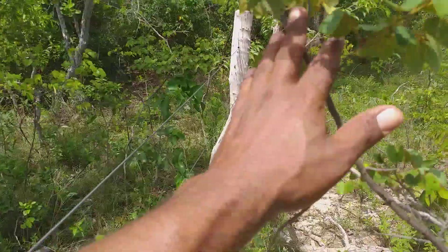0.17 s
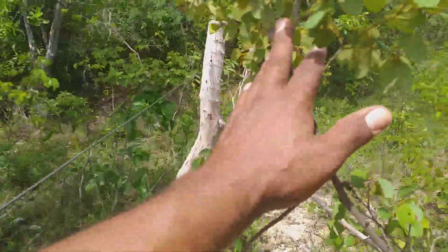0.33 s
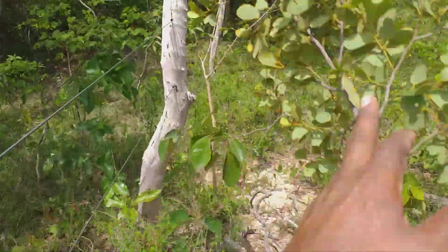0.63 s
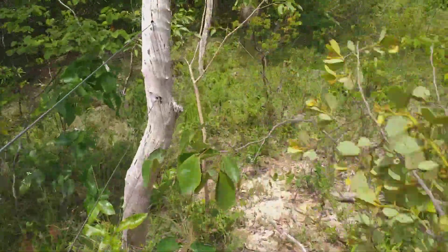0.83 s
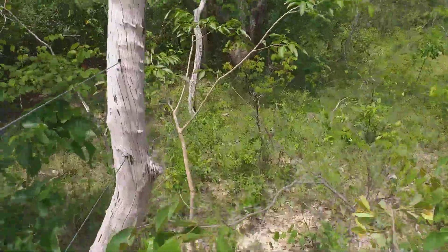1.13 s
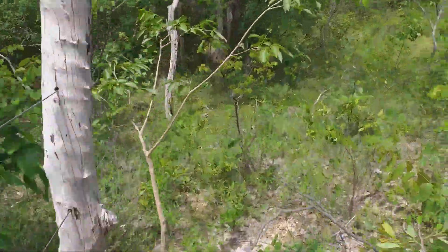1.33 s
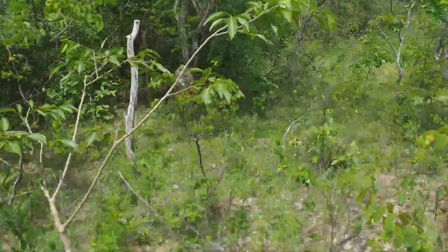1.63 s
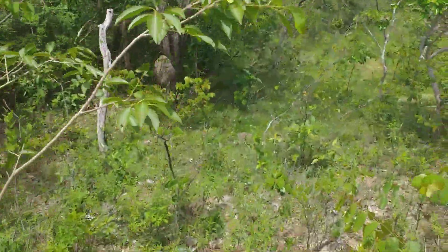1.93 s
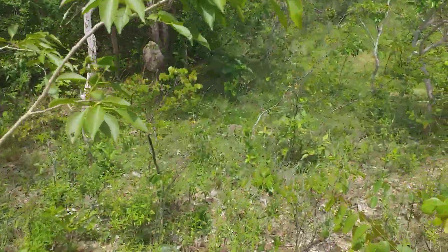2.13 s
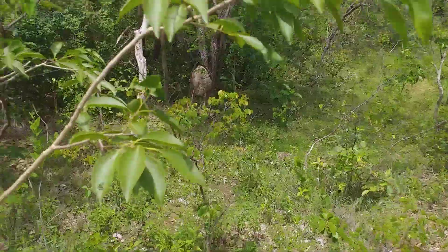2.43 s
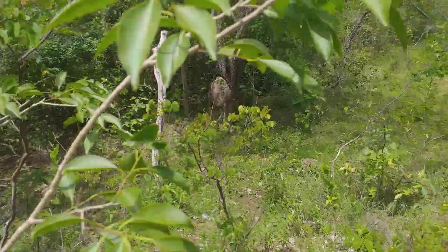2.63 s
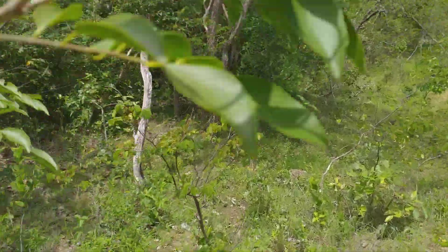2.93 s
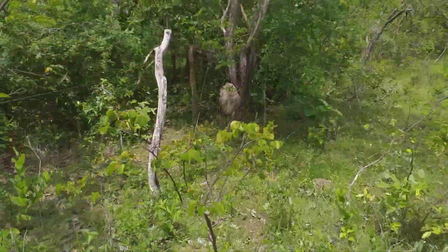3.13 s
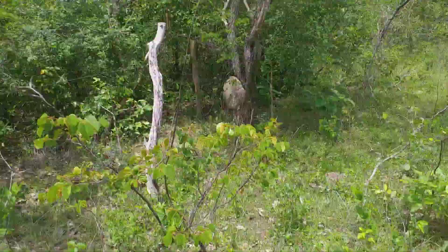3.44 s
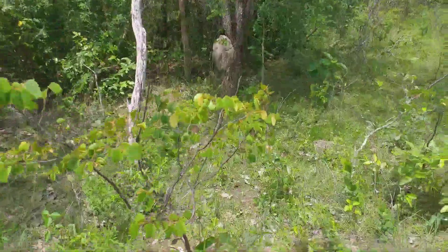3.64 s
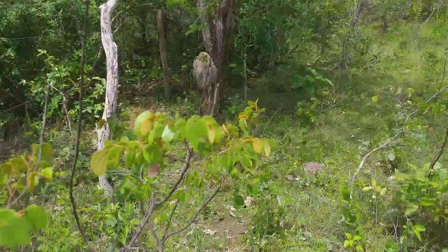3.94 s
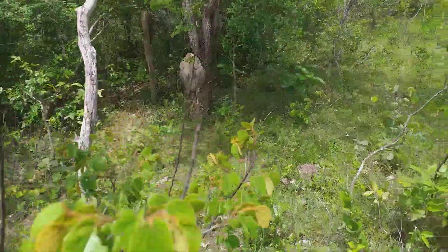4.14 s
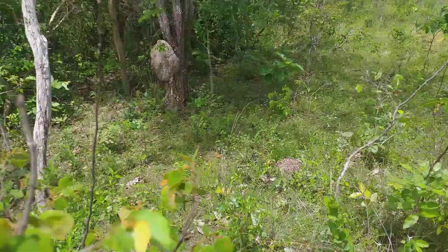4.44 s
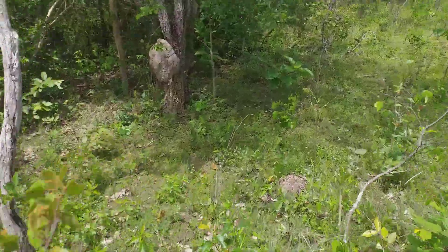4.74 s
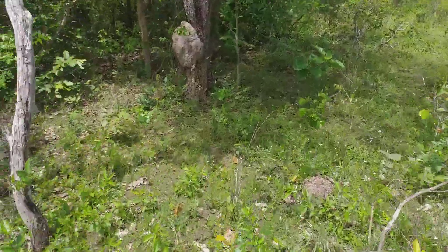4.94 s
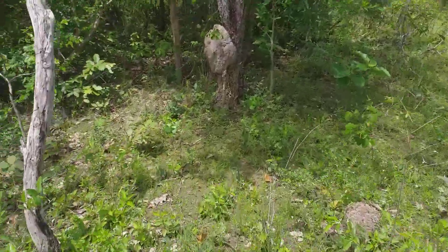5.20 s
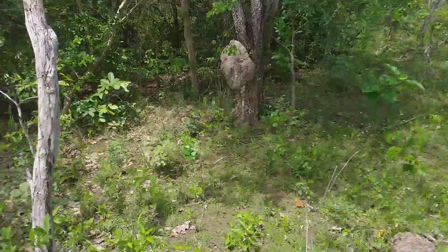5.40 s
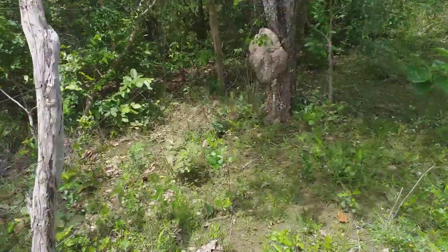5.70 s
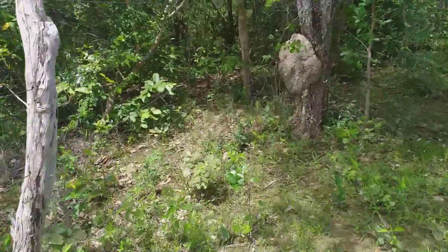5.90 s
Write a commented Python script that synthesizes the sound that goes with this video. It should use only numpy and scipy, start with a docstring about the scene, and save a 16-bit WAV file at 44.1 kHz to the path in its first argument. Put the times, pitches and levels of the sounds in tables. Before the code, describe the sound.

Close to one microphone in open dry woodland, someone moves through brush. Light leaf crunches and a soft thud come first, then a firm push with a cluster of twig snaps. It quiets to faint rustles and low knocks, a few sharp snaps follow, and dense, louder crunching fills the second half before thinning to two firm last pushes.

```python
"""Someone pushes through dry scrub woodland for six seconds, close to one microphone.
It opens with light crunching and a soft thud; a firmer push near 0.8 s brings a cluster of snaps and another thud.
Quieter leaves and low knocks follow; twigs snap at 2.2-2.4 s, then denser, louder crunching starts near 2.7 s.
The strongest snap comes near 3.2 s; past 4.9 s the snaps thin out, and two firm pushes close the scene.
Leaves are clumped ringing cracks, twigs torn resonant bursts, rubbing muffled slips, thuds damped swings."""
import sys
import numpy as np
from scipy import signal
from scipy.fft import rfft, irfft
from scipy.io import wavfile
from scipy.ndimage import uniform_filter1d

SR = 44100
rng = np.random.default_rng(int(sys.argv[2]) if len(sys.argv) > 2 else 0)


def store_pcm(level_fs):
    """Save levels as 16-bit WAV."""
    pcm = np.round(np.clip(level_fs, -1, 1) * 32767).astype(np.int16)
    wavfile.write(sys.argv[1], SR, np.atleast_2d(pcm).T)


N = 267466
TIME = np.arange(N) / SR   # seconds

# A foot or a branch presses into the leaves; body and sizzle are relative to the crunch:
# start_s, build_s, hold_s, settling_db_per_s, crunch_db, body_db, sizzle_db, rubbing_db
PUSHES = [(-0.028, 0.023, 0.217, 290.0, -47.5, -4.5, -10, -54),
          (0.171, 0.15, 0.065, 355.0, -39.5, -5, -7.5, -58.5),
          (0.415, 0.035, 0.01, 155.0, -47.5, -8.5, -5.5, -67),
          (0.499, 0.065, 0.15, 195.0, -43.0, -4.5, -12.5, -59),
          (0.751, 0.025, 0.01, 73, -33, -10.5, -10, -56), (1.008, 0.022, 0.12, 296, -45, -4.5, -6.5, -59),
          (1.172, 0.029, 0.1, 83, -53, -5, -7.5, -64), (1.493, 0.034, 0.064, 80.0, -49.5, -4, -11, -67),
          (1.615, 0.033, 0.03, 103, -43.5, -3.5, -11.5, -61.5),
          (1.909, 0.098, 0.14, 42, -59.5, -2.5, -6, -84), (2.091, 0.055, 0.25, 145.0, -44, -3.5, -7.5, -59),
          (2.446, 0.031, 0.081, 60.0, -52, -1.5, -3, -65),
          (2.484, 0.053, 0.14, 200.0, -42, -9, -6.5, -56.5),
          (2.662, 0.063, 0.13, 66, -39.0, -5.5, -10.5, -49),
          (2.937, 0.062, 0.0082, 103, -36.5, -11.5, -8.5, -52),
          (3.117, 0.088, 0.02, 170.0, -41.5, -6, -14, -62),
          (3.236, 0.019, 0.01, 65.0, -35, -8.5, -11, -55.5),
          (3.325, 0.065, 0.011, 175.0, -33.5, -5, -24, -47),
          (3.457, 0.033, 0.11, 177, -41.5, -4.0, -13.5, -57.5),
          (3.616, 0.026, 0.0082, 30, -40.5, -9, -13.5, -60),
          (3.854, 0.13, 0.047, 155.0, -38.5, -1, -7.5, -51.5),
          (4.027, 0.14, 0.17, 185.0, -34.5, -7, -12.5, -50.5),
          (4.215, 0.04, 0.076, 78, -38.5, -4, -8, -45.5), (4.397, 0.067, 0.18, 205.0, -37, -9, -6.5, -57),
          (4.631, 0.041, 0.084, 245.0, -37.5, -7.5, -7.5, -55.5),
          (4.766, 0.07, 0.077, 160.0, -45, -8, -8.5, -64.5), (4.916, 0.03, 0.17, 75.0, -41.5, -8, -5, -58),
          (5.236, 0.04, 0.01, 180.0, -36.0, -3.5, -7.0, -78),
          (5.332, 0.026, 0.012, 45.0, -46.0, -5, -9, -60.5),
          (5.534, 0.075, 0.018, 195.0, -49, -0.5, -1.5, -68),
          (5.658, 0.13, 0.0065, 155.0, -34, -8, -9.0, -66),
          (5.821, 0.051, 0.11, 82, -34, -9.5, -8.5, -53.5)]
# Spectrum of dry leaves before their bands are levelled: frequency_hz, density_db
LEAF_SPECTRUM = [(300, -3), (600, -8), (1100, -4.5), (1700, 0), (2600, -5), (4000, 3.5), (5400, 0.5),
                 (6400, 5), (7200, 0), (8100, -9.5), (8900, -15.5), (10200, -4), (12000, -0.5), (15500, -4)]
# Curled leaves and packed litter resonate while crushed; boost is before levelling:
# middle_s, half_length_s, pitch_hz, width_hz, boost_db
LITTER_RESONANCES = [(0.33, 0.14, 1540, 595, 8), (0.78, 0.074, 4640, 1800, 20),
                     (1.073, 0.018, 1750, 700, 5), (3.368, 0.036, 2660, 1110, 14),
                     (3.498, 0.15, 3830, 2960, 1), (3.598, 0.027, 2350, 600, 18),
                     (4.1, 0.022, 3580, 1010, 15), (4.21, 0.095, 2720, 1300, 7),
                     (5.36, 0.057, 1800, 800, 8), (5.92, 0.04, 3220, 683, 5)]
# Twigs and stiff leaves break; sizzle is relative to the crunch, tearing is held to 0.4 ms or more:
# start_s, crunch_db, sizzle_db, tearing_ms, ring_hz
SNAPS = [(0.1373, -37.5, 0.5, 1.4, 7500), (0.1874, -35, -11, 0.55, 4140), (0.2085, -41, 7, 1.2, 7000),
         (0.2778, -34.5, -17, 4.4, 1600), (0.2899, -31.5, -5, 1.4, 6400), (0.3696, -34.5, -17, 0.79, 6500),
         (0.452, -43.5, -17, 0.39, 3020), (0.714, -36, -11, 0.54, 7600), (0.7434, -42, -12, 1.2, 2200),
         (0.7658, -26, -1, 0.72, 4730), (0.7793, -29, 3.5, 0.82, 5900), (0.809, -37, 1, 1.2, 5000),
         (0.8225, -36, 1, 1.8, 1800), (0.8475, -30.5, -2, 1.4, 6000), (0.866, -37, -1, 1, 5500),
         (0.901, -33, -20, 1, 4630), (0.929, -38.5, 0, 1.7, 1970), (1.0616, -36.5, -26, 2, 2020),
         (1.0945, -38, -3, 2.7, 1900), (1.124, -47, 10, 2, 6800), (1.1977, -44, -11, 3.7, 1200),
         (1.2174, -37, -7.5, 1, 3200), (1.2798, -37.5, -9, 4.5, 6500), (1.388, -58, 2, 1.1, 6000),
         (1.444, -53, -8, 3.5, 6400), (1.5894, -39.5, -7, 0.85, 6600), (1.6757, -33.5, -4.5, 0.5, 1060),
         (1.6919, -35.5, -13, 1.2, 3330), (1.9147, -51.5, -20, 0.81, 2000),
         (1.9438, -45.5, -3.5, 4.3, 1190), (2.014, -45.5, -4, 3.1, 2000), (2.0424, -47, -8, 0.84, 2080),
         (2.2165, -35.5, 5, .6, 5620), (2.2535, -27, -6.5, 1.3, 6900), (2.2844, -40, -15, 3.2, 2280),
         (2.3263, -26.5, -17, 0.72, 3780), (2.3742, -35, 5, 1, 1780), (2.3924, -26, -1, 0.99, 5700),
         (2.548, -30.5, -11, 0.9, 6630), (2.5742, -41, -17, .8, 910), (2.8415, -35, -14, 5.1, 2270),
         (2.959, -28.5, -23, 1.6, 5670), (3.0519, -30.5, -14, 0.66, 6600), (3.0607, -30.5, -1.5, 1.3, 6400),
         (3.248, -20.5, -5.5, 1.7, 3770), (3.2702, -31, -2, 4, 6700), (3.2917, -28, -2, 2.8, 6200),
         (3.3358, -35.5, -30, 1.4, 2100), (3.3688, -26, -24, 1.1, 2530), (3.4602, -31, -12, 5, 3320),
         (3.4946, -32, -17, 7.8, 2500), (3.646, -35.5, -17, 2.6, 4100), (3.9243, -31, 5, 5.1, 2330),
         (3.973, -27.5, -12, 1.7, 1620), (3.9912, -34, 6, 2.2, 6640), (4.0296, -29.5, -22, 3.9, 1810),
         (4.1133, -29.5, -6, 4.3, 4570), (4.16, -31.5, -6, 4, 1710), (4.1805, -32, -18, 0.96, 3560),
         (4.2058, -25.5, -9, 1.6, 5950), (4.2725, -24.5, -20, 1.9, 2820), (4.2985, -27, -22, 1.5, 2070),
         (4.3497, -35.5, -1, 3.1, 2200), (4.5408, -24, -6.5, 9.2, 4940), (4.6733, -28.5, 3, 4.7, 7050),
         (4.685, -22.5, -11, 0.45, 5100), (4.752, -36.5, 3, 2.6, 3100), (4.859, -38, 0, 0.53, 2490),
         (5.0939, -35, -4, .8, 6700), (5.1586, -35, -13, 1.6, 4300), (5.2204, -38.5, -15, 0.6, 3980),
         (5.3272, -29.5, -8, 0.58, 3020), (5.3415, -32, -13, 0.92, 1650), (5.3613, -47, -14, .5, 1900),
         (5.3694, -39.5, -17, .7, 1600), (5.4381, -34, -14, 2.2, 1560), (5.49, -41.5, -3, 0.8, 3400),
         (5.901, -28.5, -16, 3.2, 3270), (5.9682, -29, -3.5, 0.65, 2700), (6.0193, -25.5, -16, 1.9, 2800)]
# Spectrum of breaking twigs before their bands are levelled: frequency_hz, density_db
SNAP_SPECTRUM = [(300, -8), (600, -9), (1000, -3.5), (1700, 2.5), (4000, 2.5), (6400, 5.5), (7200, 1.5),
                 (8800, -11), (10200, -0.5), (15500, 0.5)]
# Spectrum of rubbing before it is levelled: frequency_hz, density_db
RUB_SPECTRUM = [(25, -51), (40, -5), (60, -10), (90, 0), (200, 1.5), (420, 1), (650, -2.5), (1000, -0.5),
                (2500, -45)]
# Cloth and stems resonate as they slide; boost is before levelling:
# middle_s, half_length_s, pitch_hz, width_hz, boost_db
SCUFF_RESONANCES = [(0.072, 0.048, 520, 149, 17), (0.13, 0.039, 322, 100, 15), (2.14, 0.16, 423, 180, -6),
                    (2.814, 0.12, 636, 300, 0), (6.023, 0.071, 370, 149, 24)]
# Soft low thuds and knocks, some from handling the microphone; level is the amplitude before onset and decay:
# start_s, level_db, pitch_hz, decay_s
THUDS = [(0.072, -46, 150, 0.011), (0.768, -49.5, 174, 0.036), (1.145, -42.5, 156, 0.035),
         (1.154, -49, 85, 0.061), (1.198, -36.5, 260, 0.0025), (1.25, -54, 116, 0.019),
         (3.079, -49, 158, 0.012), (3.393, -38, 306, 0.0035), (5.44, -31.5, 251, 0.0019),
         (5.449, -51, 116, 0.014)]
# Spectrum of the still air, before its level is set: frequency_hz, density_db
AIR_SPECTRUM = [(25, -35), (70, 8.5), (300, -14.5), (1500, -26), (6000, -0.5), (9000, -50), (16000, -44)]

BODY_HZ, CRUNCH_HZ, SIZZLE_HZ = (450, 2500), (2500, 8500), (8500, 17000)   # band edges
STIR_DB = (-68, -79, -73, -89)   # leaves never quite rest: crunch, body, sizzle, rubbing
SNAP_S = 0.008   # a snap's level is its rms over this time
RING_Q, DAMPING_HZ = 14, 414   # sharpness of a twig's ring; bandwidth added by the litter around it
TWIG_BODY_DB, TWIG_HZ = -2, 2000   # body relative to crunch for a twig that rings at this pitch
THINNING_DB_PER_OCTAVE = 5   # thinner twigs ring higher and have less body
TICKS_PER_S, TICK_DB, TICK_SPREAD_DB = 7.0, -4.5, 9.5   # level relative to the crunch, plus or minus the spread
TICK_SIZZLE_DB, TICK_TEAR_MS, TICK_RING_HZ = -2, 0.4, (1610, 7000)   # the last is a range
AIR_DB = -69   # rms ahead of the microphone
CUTOFF_HZ = 15900


def pressure():
    """Superposition of power: each push builds, holds and settles; returns crunch, body, sizzle, rubbing in dB."""
    power = from_db(STIR_DB)[:, None] ** 2 * np.ones(N)
    for start_s, build_s, hold_s, settling_db_per_s, crunch_db, body_db, sizzle_db, rub_db in PUSHES:
        age = np.maximum(TIME - start_s, 0)
        build = np.sin(np.pi / 2 * np.minimum(age / build_s, 1)) ** 2
        fall_db = np.clip(settling_db_per_s * (age - build_s - hold_s), 0, 120)
        envelope = build * from_db(-fall_db)
        levels_db = [crunch_db, crunch_db + body_db, crunch_db + sizzle_db, rub_db]
        power += np.outer(from_db(levels_db) ** 2, envelope ** 2)
    return 10 * np.log10(power)


def leaves(crunch_db, body_db, sizzle_db, count=24):
    """Clustered fracture: cracks clump, more of them under pressure, over the hiss of sliding blades."""
    clumping_db = 5.3 * drift(90)
    cracks_per_s = 850 * from_db(0.45 * (crunch_db - crunch_db.mean()) + clumping_db)
    cracks = clicks(cracks_per_s, spread_db=3.5)
    leaf = rng.integers(0, count, N)   # each crack rings a leaf of one of these sizes
    crackle = np.zeros(N)
    for k, hz in enumerate(np.geomspace(1100, 13000, count)):
        crack = leaf_crack(hz, sharpness=4.0, tear_s=0.0005, ring_share=0.9, scatter_db=-16, scatter_s=0.004)
        crackle += signal.oaconvolve(cracks * (leaf == k), crack)[:N]
    sliding = rng.standard_normal(N) * from_db(2.2 * drift(100))
    mixture = evened(crackle, window_s=0.33) + from_db(-0.5) * sliding
    texture = resonating(coloured(mixture, LEAF_SPECTRUM), LITTER_RESONANCES)
    out = np.zeros(N)
    for edges_hz, level_db in ((BODY_HZ, body_db), (CRUNCH_HZ, crunch_db), (SIZZLE_HZ, sizzle_db)):
        out += from_db(level_db) * evened(band(texture, edges_hz), window_s=0.075)
    return out


def leaf_crack(hz, sharpness, tear_s, ring_share, scatter_db, scatter_s, size=1024):
    """Impulsive excitation: a buckling leaf tears briefly, rings its blade and scatters off the litter."""
    t = TIME[:size]
    decay = np.exp(-t / tear_s) + from_db(scatter_db) * np.exp(-t / scatter_s)
    tear = rng.standard_normal(size) * decay
    ring = resonance(tear, hz, hz / sharpness)
    return rms_one(tear) + ring_share * rms_one(ring)


def snaps(rows, size=3072):
    """Fracture and resonance: tearing fibres ring the twig; ground and leaves return a short, faint tail."""
    t, out = TIME[:size], np.zeros(N + size)
    for start_s, crunch_db, sizzle_db, tearing_ms, ring_hz in rows:
        body_db = TWIG_BODY_DB - THINNING_DB_PER_OCTAVE * np.log2(ring_hz / TWIG_HZ)
        tear_s = max(tearing_ms, 0.4) / 1000
        rise = 1 - np.exp(-t / (0.29 * tear_s))   # slow tears also build up slowly
        tail = from_db(-16.5) * np.exp(-t / 0.006)
        tear = rng.choice([-1, 1], size) * rise * np.hypot(np.exp(-t / tear_s), tail)
        width_hz = np.hypot(ring_hz / RING_Q, DAMPING_HZ)
        burst = coloured(tear + 3.3 * resonance(tear, ring_hz, width_hz), SNAP_SPECTRUM)
        at = int(np.clip(start_s * SR, 0, N))
        for edges_hz, relative_db in ((BODY_HZ, body_db), (CRUNCH_HZ, 0), (SIZZLE_HZ, sizzle_db)):
            part = band(burst, edges_hz, order=3)
            part_rms = np.sqrt(np.sum(part ** 2) / (SNAP_S * SR))
            out[at:at + size] += from_db(crunch_db + relative_db) * part / part_rms
    return out[:N]


def ticks(crunch_db, count=80):
    """Poisson process: small stalks break at random, louder under pressure; returns rows shaped like SNAPS."""
    wait, size, pitch = rng.random((count, 3)).T
    starts_s = np.cumsum(-np.log1p(-wait)) / TICKS_PER_S
    spread_db = TICK_SPREAD_DB * (2 * size - 1)
    levels_db = np.interp(starts_s, TIME, crunch_db) + TICK_DB + spread_db
    low_hz, high_hz = TICK_RING_HZ
    rings_hz = low_hz * (high_hz / low_hz) ** pitch
    return [(start_s, level_db, TICK_SIZZLE_DB, TICK_TEAR_MS, ring_hz)
            for start_s, level_db, ring_hz in zip(starts_s, levels_db, rings_hz) if start_s < TIME[-1]]


def rubbing(rub_db):
    """Stick-slip friction: stems and leaves catch and slip on clothing, which muffles them."""
    slips_per_s = 400 * from_db(4.0 * drift(40))
    slips = rms_one(clicks(slips_per_s, spread_db=2.5))
    friction = slips + 0.5 * rng.standard_normal(N)
    texture = resonating(coloured(friction, RUB_SPECTRUM), SCUFF_RESONANCES)
    return from_db(rub_db) * evened(texture, window_s=0.12)


def thuds():
    """Damped oscillation: each thud or knock dies away in a few uneven swings."""
    out, uneven_rad = np.zeros(N), 0.85 * drift(70)
    for start_s, level_db, pitch_hz, decay_s in THUDS:
        age = np.maximum(TIME - start_s, 0)
        swing = np.sin(2 * np.pi * pitch_hz * age + uneven_rad)
        onset = 1 - np.exp(-age * pitch_hz / 0.056)   # higher thuds start faster
        out += from_db(level_db) * swing * onset * np.exp(-age / decay_s)
    return out


def still_air():
    """Stationary noise: the still air of the wood is a steady, faint, filtered hiss."""
    return from_db(AIR_DB) * rms_one(coloured(rng.standard_normal(N), AIR_SPECTRUM))


def clicks(per_s, spread_db):
    """Random impulse train: clicks at chance moments, many small and few large."""
    sizes_db = spread_db * np.minimum(rng.exponential(1, N), 4)
    signs = rng.choice([-1, 1], N)
    return from_db(sizes_db) * signs * (rng.random(N) < per_s / SR)


def resonance(x, hz, width_hz):
    """Simple resonator: two poles, with gain 1 at the peak."""
    return signal.lfilter(*signal.iirpeak(hz, hz / width_hz, fs=SR), x + 1e-18)


def resonating(texture, rows):
    """Forced resonance: resonators swell and fade, each driven by the texture itself."""
    out = texture
    for middle_s, half_length_s, pitch_hz, width_hz, boost_db in rows:
        swell = np.exp(-((TIME - middle_s) / half_length_s) ** 2)
        out = out + from_db(boost_db) * swell * resonance(texture, pitch_hz, width_hz)
    return out


def coloured(x, spectrum, size=4096):
    """Minimum-phase filtering: follows the points of a spectrum, and nothing sounds early."""
    hz, db = np.transpose(spectrum)
    grid_hz = np.maximum(np.fft.rfftfreq(size, 1 / SR), 1)
    gain = from_db(np.interp(np.log(grid_hz), np.log(hz), db))
    cepstrum = irfft(np.log(gain))
    cepstrum[1:size // 2] *= 2   # fold onto positive times
    cepstrum[size // 2 + 1:] = 0
    response = irfft(np.exp(rfft(cepstrum)))[:size // 2]
    return signal.fftconvolve(x, response)[:len(x)]


def band(x, edges_hz, order=4):
    """Band limitation: a causal Butterworth band-pass."""
    return signal.sosfilt(signal.butter(order, edges_hz, "band", fs=SR, output="sos"), x + 1e-18)


def evened(x, window_s):
    """Envelope normalisation: removes slow swells, keeps the grain, and brings the rms to about 1."""
    size = max(int(window_s * SR), 2)
    power = uniform_filter1d(uniform_filter1d(x ** 2, size), size)
    return x / np.sqrt(np.abs(power) + 1e-12)


def drift(rate):
    """Interpolated noise: random values, rate of them a second, joined by lines and scaled to rms 1."""
    return rms_one(np.interp(TIME * rate, np.arange(8192), rng.standard_normal(8192)))


def rms_one(x):
    """Power normalisation: scale to rms 1."""
    return x / np.sqrt(np.mean(x ** 2) + 1e-20)


def from_db(db):
    """Logarithmic level: decibels to amplitude gain."""
    return 10 ** (np.asarray(db) / 20)


def scene():
    """Linear superposition: all sources add, close by and in the open, without reverberation."""
    crunch_db, body_db, sizzle_db, rub_db = pressure()
    litter = leaves(crunch_db, body_db, sizzle_db)
    twigs = snaps(SNAPS + ticks(crunch_db))
    mixture = litter + twigs + rubbing(rub_db) + thuds() + still_air()
    return mixture[None]   # one channel


def record(dry):
    """Band-limited transduction: the microphone sheds the deepest bass and the top is cut steeply."""
    lean = signal.sosfilt(signal.butter(3, 45, "high", fs=SR, output="sos"), dry)
    return signal.sosfilt(signal.ellip(10, 0.2, 80, CUTOFF_HZ, fs=SR, output="sos"), lean)


dry = scene()
out = record(dry)
store_pcm(out)
```